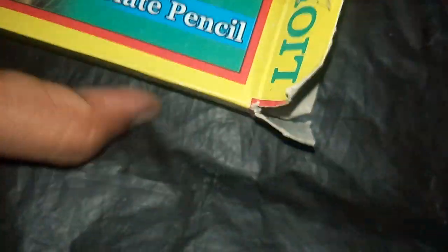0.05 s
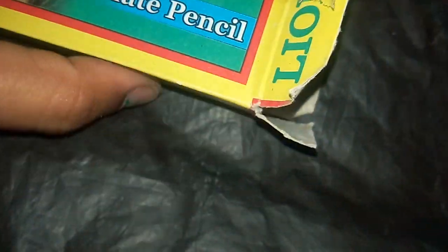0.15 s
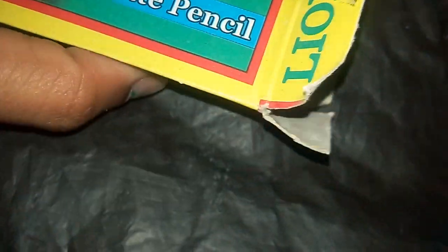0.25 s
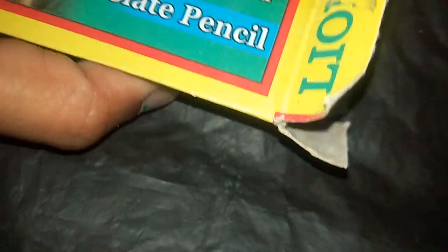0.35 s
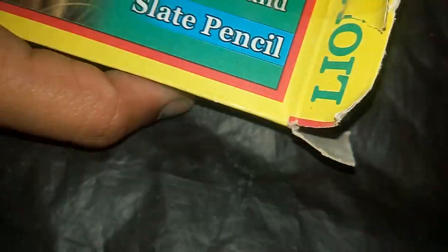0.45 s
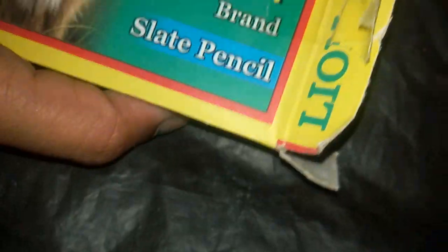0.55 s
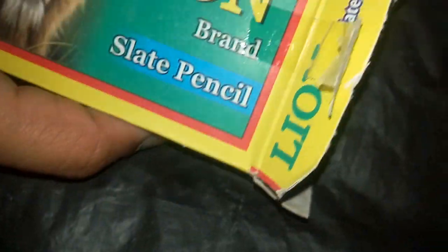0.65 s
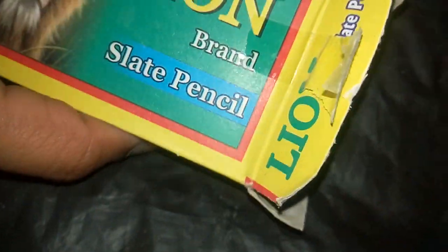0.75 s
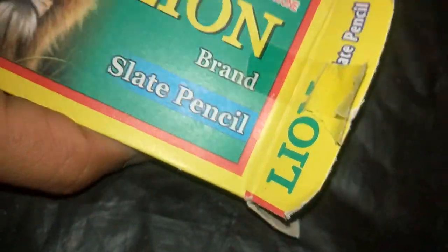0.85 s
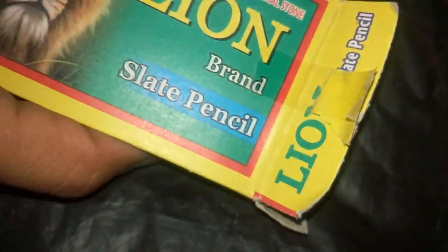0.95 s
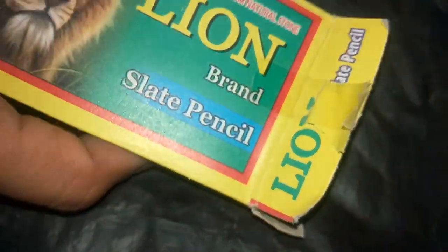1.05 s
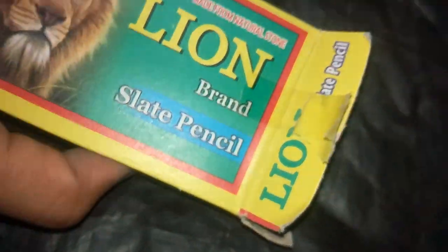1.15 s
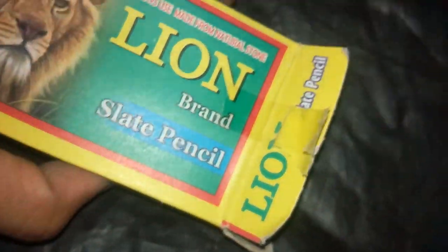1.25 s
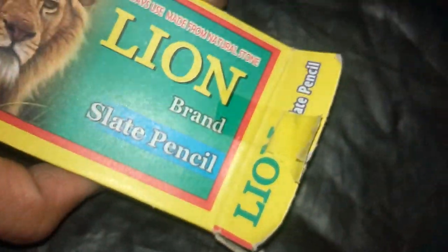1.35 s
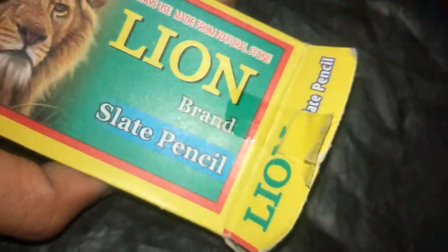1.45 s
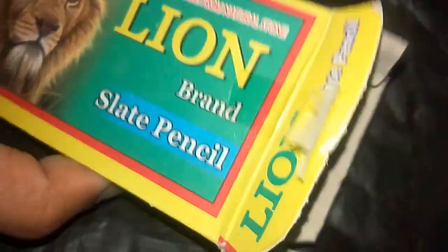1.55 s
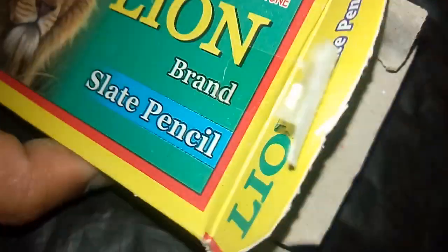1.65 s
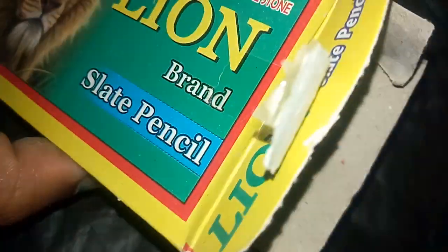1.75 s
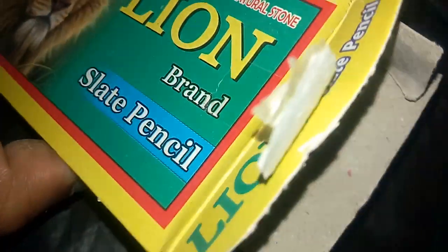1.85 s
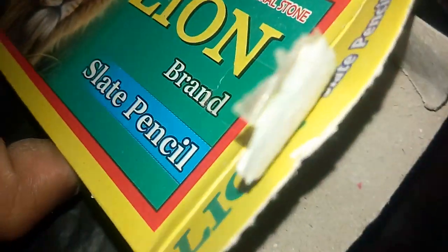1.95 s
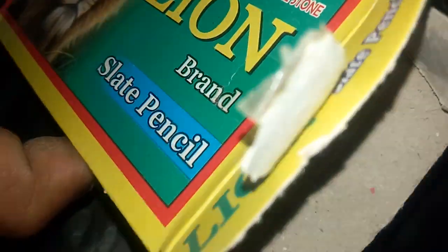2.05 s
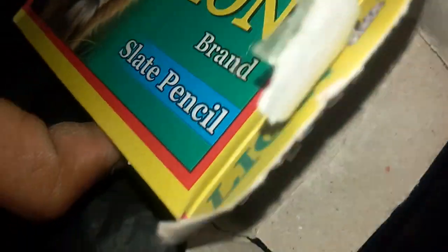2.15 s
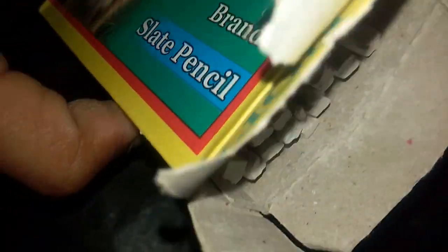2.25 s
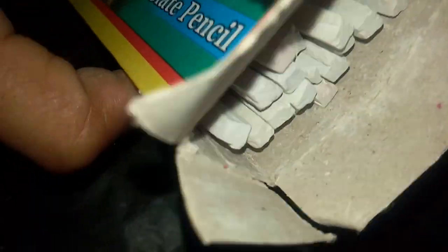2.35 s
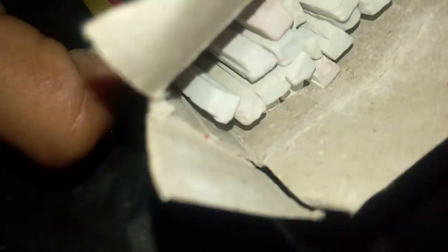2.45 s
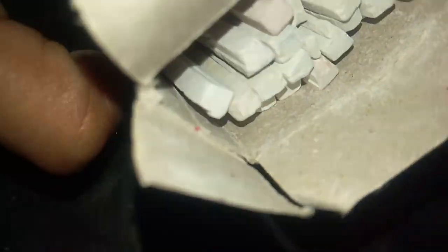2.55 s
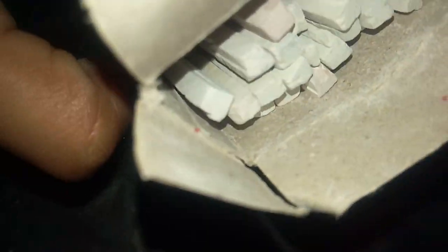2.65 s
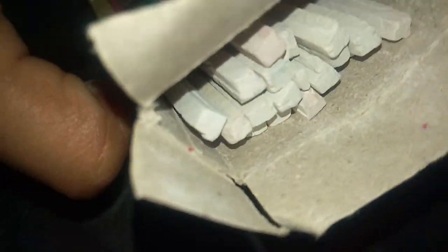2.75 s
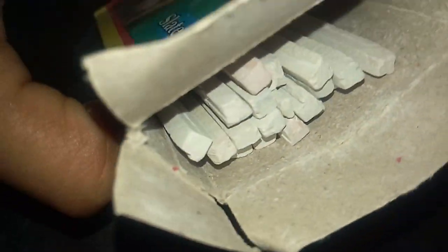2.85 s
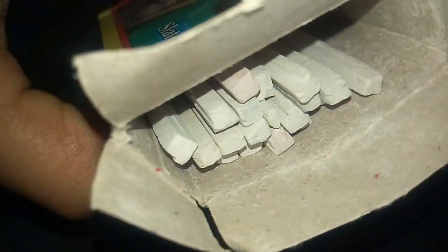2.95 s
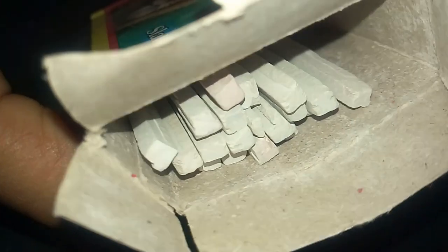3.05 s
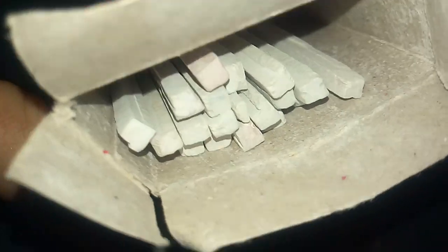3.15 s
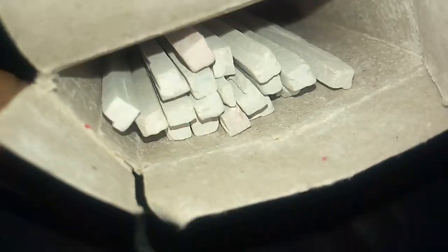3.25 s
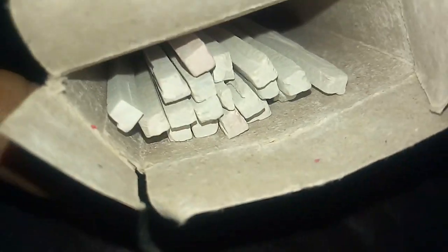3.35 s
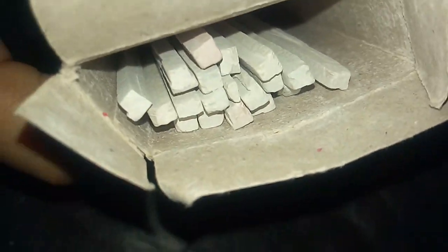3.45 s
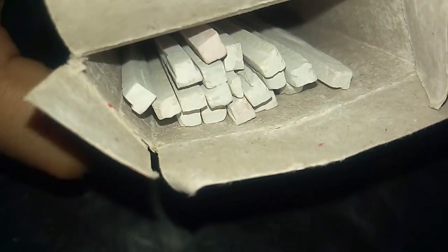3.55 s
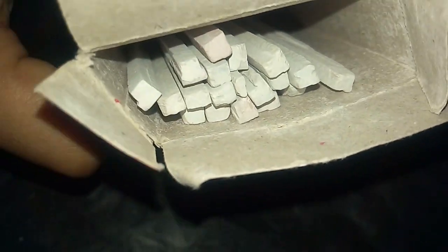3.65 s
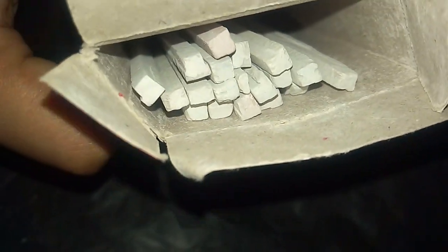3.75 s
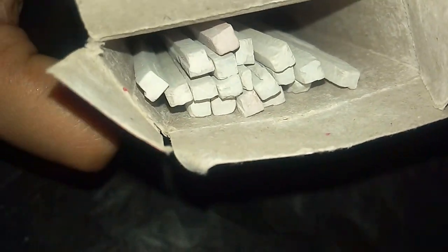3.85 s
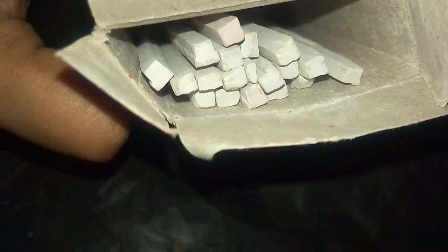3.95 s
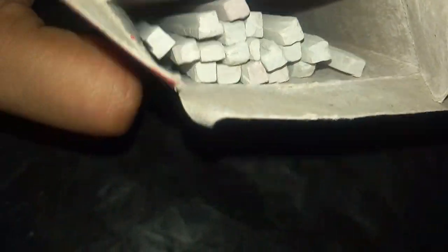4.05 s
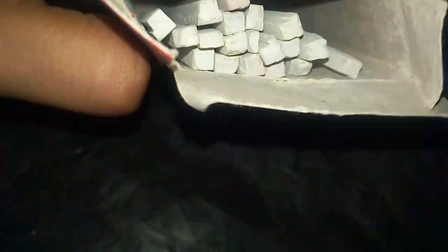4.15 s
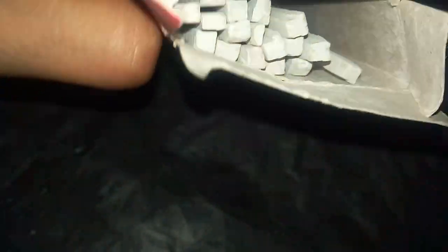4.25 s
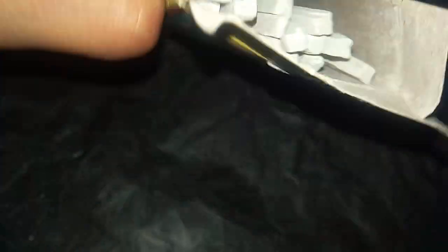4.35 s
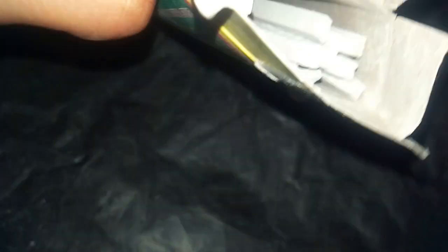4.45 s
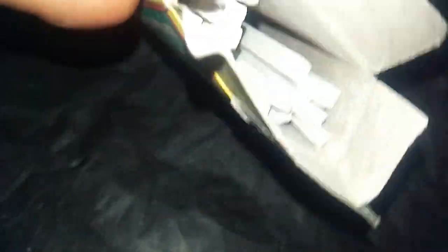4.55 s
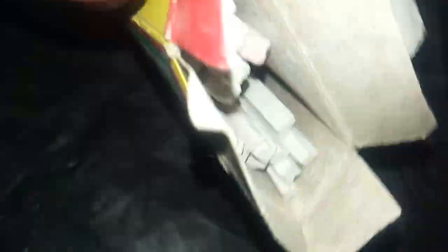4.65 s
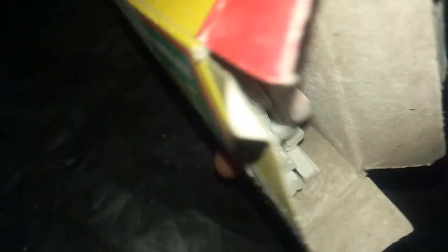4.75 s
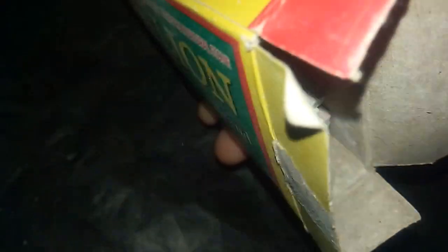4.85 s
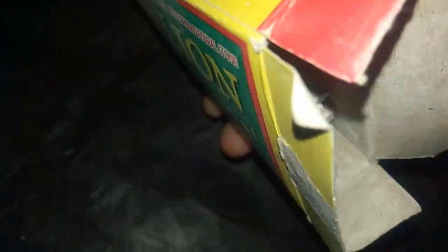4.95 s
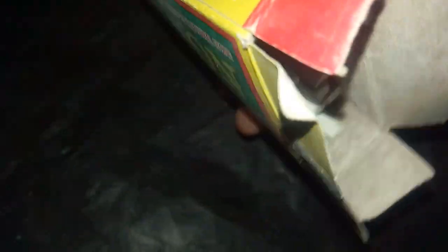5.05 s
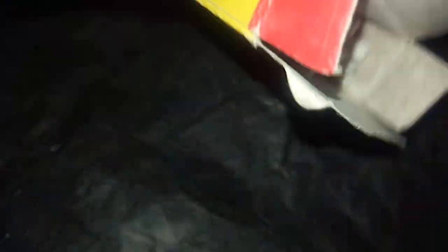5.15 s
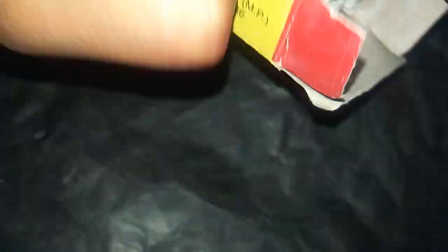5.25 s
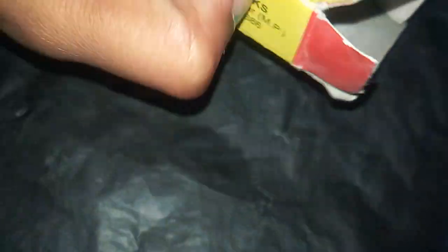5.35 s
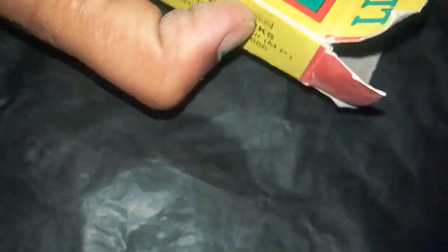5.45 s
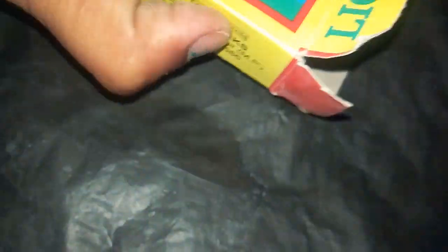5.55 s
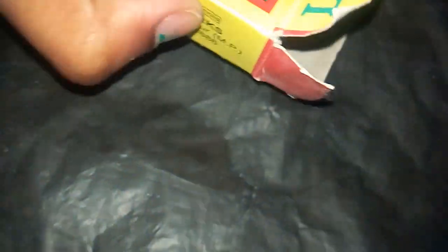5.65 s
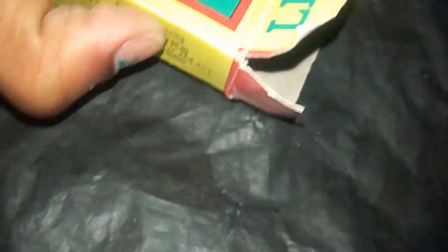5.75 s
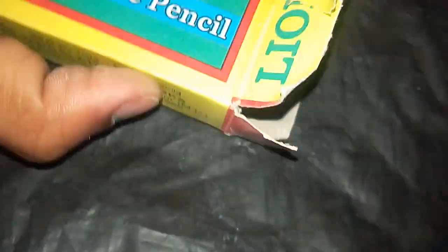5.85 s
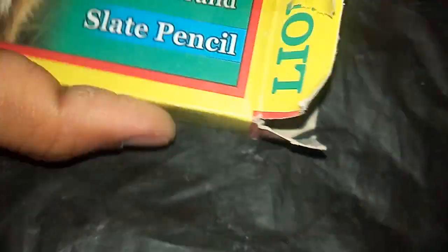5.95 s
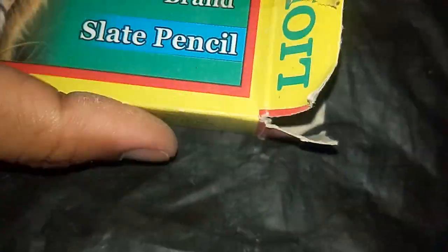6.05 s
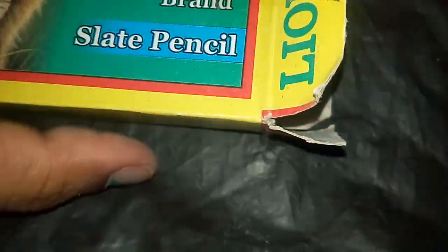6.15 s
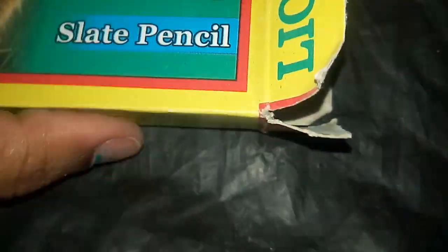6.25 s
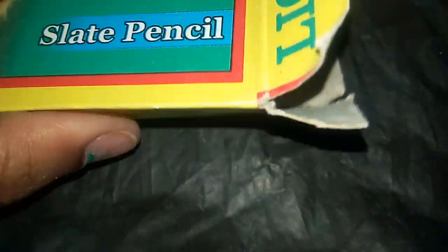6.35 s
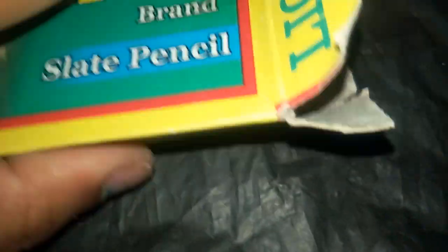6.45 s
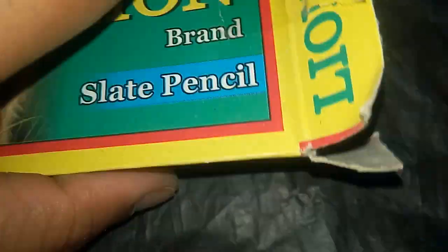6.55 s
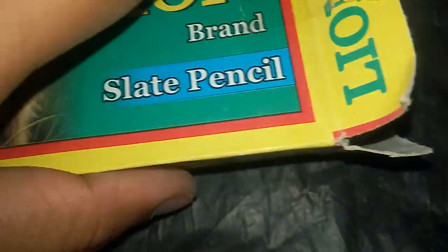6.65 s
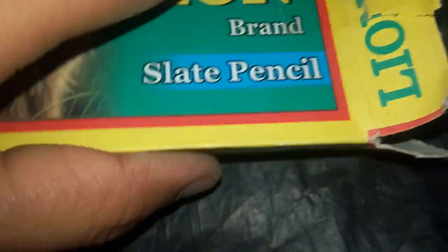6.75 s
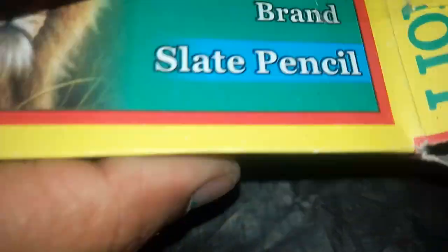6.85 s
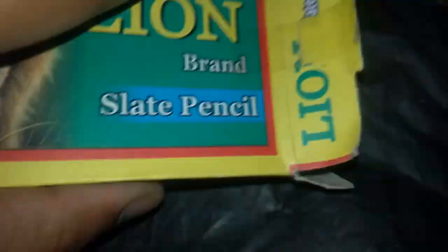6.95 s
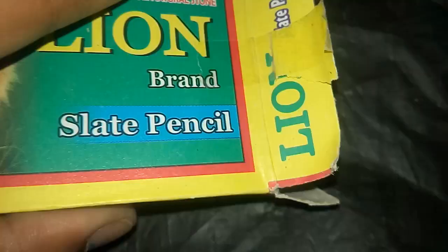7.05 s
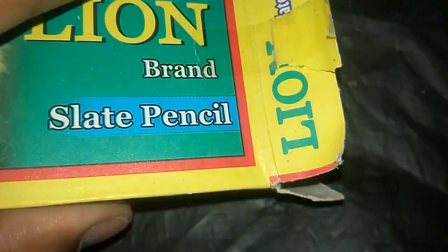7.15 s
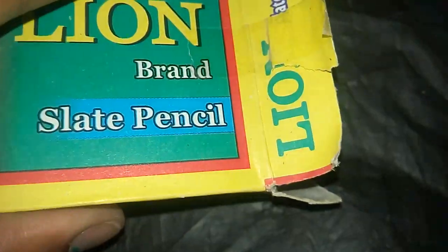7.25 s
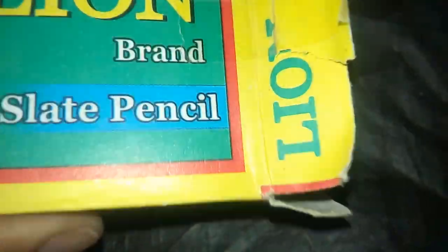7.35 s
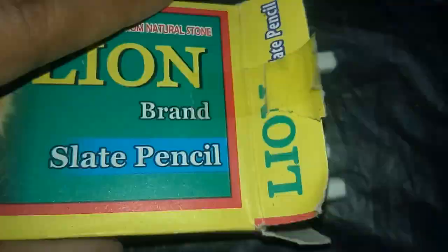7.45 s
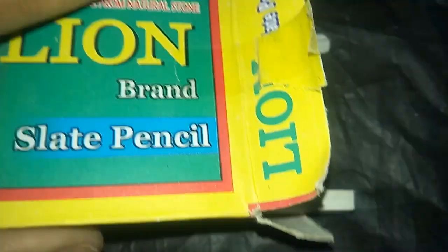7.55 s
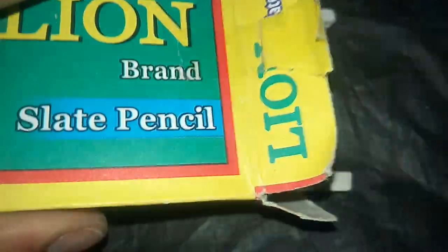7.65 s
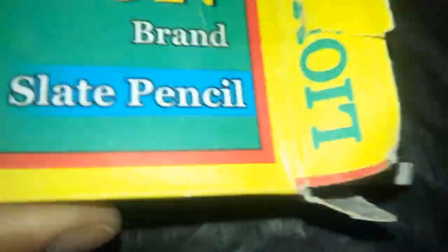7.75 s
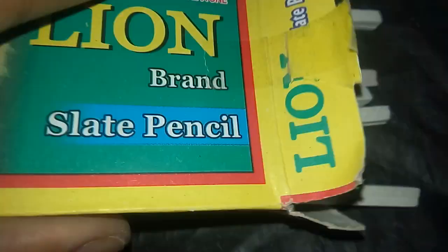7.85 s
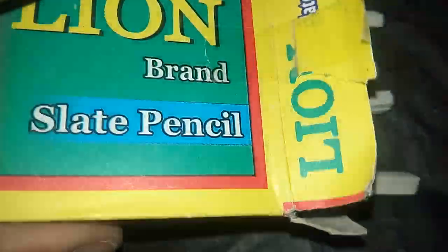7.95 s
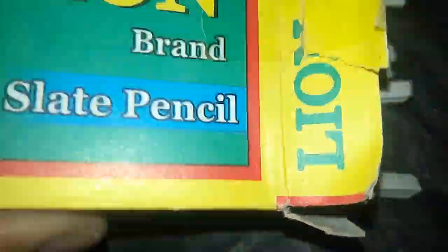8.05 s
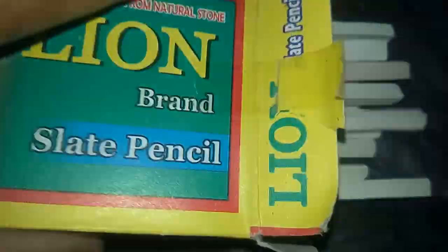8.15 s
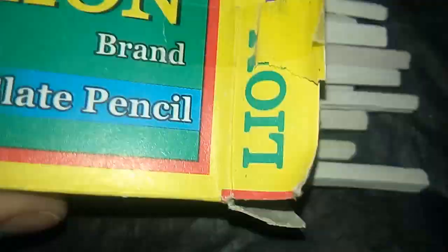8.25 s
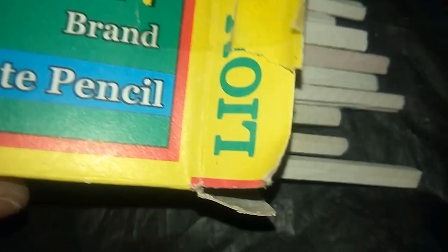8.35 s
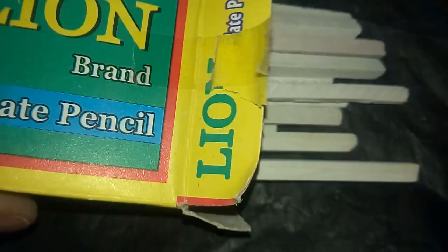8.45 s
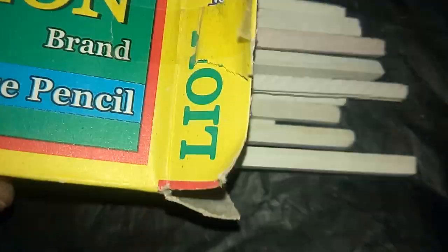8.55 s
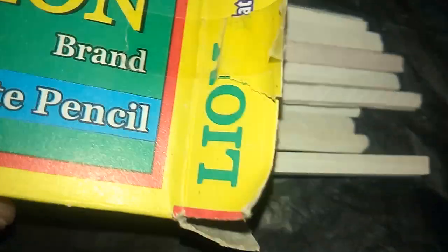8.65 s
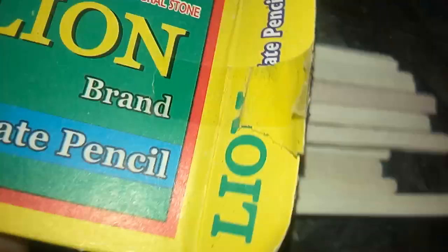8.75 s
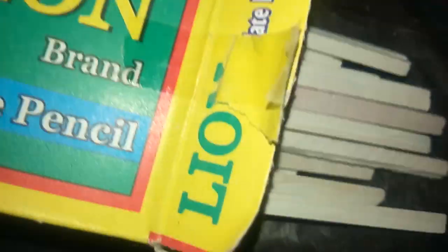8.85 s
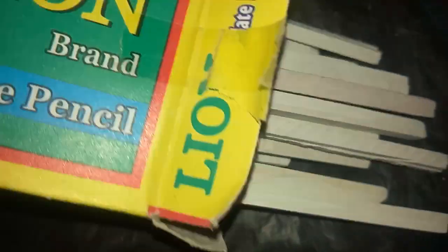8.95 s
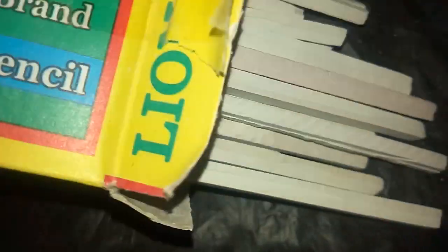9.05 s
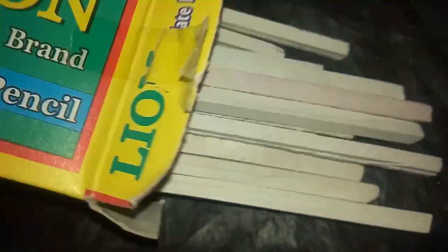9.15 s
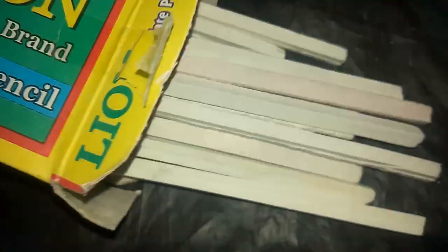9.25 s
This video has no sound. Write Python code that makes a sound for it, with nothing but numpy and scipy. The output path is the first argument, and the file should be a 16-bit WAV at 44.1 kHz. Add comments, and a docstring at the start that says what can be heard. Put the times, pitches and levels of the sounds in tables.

```python
"""Slate pencils in a cardboard box

A thin box is turned in the hand close to two microphones, its flap opened and shut. Fingers rub the
card and the creases snap. Then the box is shaken, and the stone sticks slide, collide and work their
way out. The room is quiet, apart from a thin whirr and two dull booms that roll in from far off."""
import sys
import numpy as np
from scipy import signal
from scipy.fft import rfft, irfft
from scipy.io import wavfile

SR = 44100
rng = np.random.default_rng(int(sys.argv[2]) if len(sys.argv) > 2 else 0)


def wrap_up_sound(samples):
    """Save the sound to the file named by the first command line argument, as 16-bit audio."""
    columns = np.atleast_2d(samples).T
    # keep every value between -1 and 1, then stretch to whole-number steps
    tamed = np.clip(columns, -1, 1)
    steps = np.round(tamed * 32767).astype(np.int16)
    wavfile.write(sys.argv[1], SR, steps)


N = 409248
TIME = np.arange(N) / SR


def from_db(db):
    """Turn decibels into a gain to multiply by."""
    return 10 ** (np.asarray(db) / 20)


def unit_power(x):
    """Scale a sound to an average power of 1."""
    return x / np.sqrt(np.mean(x ** 2) + 1e-20)


def drift(per_s):
    """A random wander around zero, mostly between -1 and 1."""
    steps = rng.standard_normal(4096)
    return np.interp(TIME * per_s, np.arange(len(steps)), steps)


def keep_band(x, hz, kind, order=2):
    """Let only the lows, the highs or a band between them through."""
    return signal.sosfilt(signal.butter(order, hz, kind, fs=SR, output="sos"), x + 1e-18)


def colour(x, curve, keep_power=True, size=4096):
    """Make some pitches stronger and others weaker, following rows of frequency in Hz and dB."""
    known_hz, db = np.transpose(curve)
    hz = np.fft.rfftfreq(size, 1 / SR)
    gain = from_db(np.interp(np.log(hz + 1), np.log(known_hz), db))
    cepstrum = irfft(np.log(unit_power(gain) if keep_power else gain))
    # folding it in half keeps the filter from ringing before a sound arrives
    cepstrum[1:size // 2] *= 2
    cepstrum[size // 2 + 1:] = 0
    return signal.oaconvolve(x, irfft(np.exp(rfft(cepstrum))))[:N]


def resonate(x, hz, width_hz):
    """Ring at one pitch; the greater the width, the sooner it dies."""
    r = np.exp(-np.pi * width_hz / SR)
    feedback = [1, -2 * r * np.cos(2 * np.pi * hz / SR), r * r]
    return (1 - r * r) / 2 * signal.lfilter([1, 0, -1], feedback, x + 1e-18)


def lean(pair, balance):
    """Share a sound between left and right, pitch by pitch."""
    return np.array([colour(ear, [(hz, side * db / 2) for hz, db in balance], keep_power=False)
                     for ear, side in zip(pair, (1, -1))])


def echoes(x, fade_s, gap_s, size=16384):
    """Dense reflections, different at each microphone, that fall 60 dB in fade_s."""
    t = np.arange(size) / SR
    tails = rng.standard_normal((2, size)) * from_db(-60 * t / fade_s) * (t > gap_s)
    return np.array([signal.oaconvolve(x, unit_power(tail) / np.sqrt(size))[:N] for tail in tails])


def grains(per_s, spread_db):
    """Tiny contacts of uneven size at random moments."""
    sizes = from_db(spread_db * np.minimum(rng.exponential(1, N), 4)) * rng.choice([-1, 1], N)
    return unit_power(sizes * (rng.random(N) < per_s / SR))


def jolts(rows):
    """A strength that swells and dies around each listed moment."""
    return np.sqrt(sum((from_db(db) / np.cosh(np.clip((TIME - s) / half_s, -50, 50))) ** 2
                       for s, db, half_s in rows))


def hold(start_s, length_s, attack_s=0.028, release_s=0.025):
    """A gain that fades in, stays at 1 and lets go."""
    early = np.maximum(start_s - TIME, 0)
    late = np.maximum(TIME - start_s - length_s, 0)
    return np.exp(-np.minimum(early / attack_s + late / release_s, 30))


def swell(peak_s, rise_s, fall_s):
    """A gain that grows to 1 and dies away at once."""
    return np.exp(-np.minimum(np.maximum((peak_s - TIME) / rise_s, (TIME - peak_s) / fall_s), 30))


# The tone of the quiet room. Each row: frequency in Hz, relative level in dB.
AIR_TONE = [(25, -26), (59, 0), (133, -6.5), (216, -10.5), (391, -10.5), (500, -1.5), (700, -14.5),
            (1000, -16.5), (1460, -18), (2400, -10.5), (3370, -14.5), (6500, -23), (8000, -42),
            (15000, -37)]
# How alike its two sides are. Each row: frequency in Hz, likeness (1 the same, 0 unrelated).
AIR_LIKENESS = [(60, 0.9), (180, 0.47), (550, 0.59), (1650, -0.28), (4970, 0.044), (15000, -0.02)]
# It is brighter on the right. Each row: frequency in Hz, left over right in dB.
AIR_BALANCE = [(550, 1), (1650, -7.5), (5000, -13.5), (15000, 1)]


def room_air():
    """The room's steady hush, less alike left and right toward the treble."""
    shared, apart = [colour(noise, AIR_TONE) for noise in rng.standard_normal((2, N))]
    apart_curve = [(hz, 10 * np.log10((1 - alike) / (1 + alike))) for hz, alike in AIR_LIKENESS]
    apart = colour(apart, apart_curve, keep_power=False)
    return from_db(-67.5) * lean([shared + apart, shared - apart], AIR_BALANCE)


# How the background whirr fades. Each row: time in seconds, level in dB.
WHIRR_LEVELS = [(0, -55), (1.2, -57), (2.3, -58.5), (2.8, -76), (4.1, -74), (9.28, -94.5)]
# Its tone. Each row: frequency in Hz, relative level in dB.
WHIRR_TONE = [(1100, -22.5), (1480, -0.5), (2000, -5.5), (2400, -1), (2900, 0), (3600, -1.5), (4400, -6),
              (6500, -9), (9000, -31.5)]
# Its squeak stands out. Each row: peak time in seconds, relative level in dB, half-length in seconds.
SQUEAKS = [(1.48, -67.5, .08), (2.14, -67, 0.067)]


def whirr():
    """A thin hiss near 3 kHz with a fitful squeak in it; both sink away after two seconds or so."""
    level = from_db(np.interp(TIME, *np.transpose(WHIRR_LEVELS)))
    hiss = np.array([colour(noise, WHIRR_TONE) for noise in rng.standard_normal((2, N))])
    squeak = 0
    for hz in (2860, 3280):
        note = resonate(resonate(rng.standard_normal(N), hz, width_hz=120), hz, width_hz=120)
        squeak += unit_power(note) * from_db(2.6 * drift(7.1))
    return level * (hiss + from_db(-17) * squeak) + jolts(SQUEAKS) * squeak


# The box lies toward the left microphone. Each row: frequency in Hz, left over right in dB.
BOX_BALANCE = [(60, 3), (200, 10), (600, 4), (1300, 9), (2400, 4.5), (4400, -3.5), (8000, -2), (15000, 7.5)]


def from_box(x, turns_per_s, paths, lag_s=0.00017):
    """Sound reaches the left microphone first; its paths off hand and flaps change as the box moves."""
    direct = np.array([x, np.interp(TIME - lag_s, TIME, x)])
    upper = keep_band(x, 614, "high")
    shares = np.array([from_db(10 * drift(turns_per_s)) for _ in range(paths)])
    shares /= np.sqrt(np.sum(shares ** 2, axis=0))
    scattered = sum(share * echoes(upper, fade_s=0.016, gap_s=0.0003, size=2048) for share in shares)
    return lean(direct + from_db(-0.5) * scattered, BOX_BALANCE)


# Fingers rub the card or bend a flap. Each row: start and length in seconds, then the
# relative levels in dB of surface hiss, edge scrape and wall drumming.
RUBS = [(-0.02, .2, -52, -61.5, -60), (0.306, 0.057, -54, -72, -61.5), (0.416, .16, -57, -81, -55.5),
        (0.68, 0.21, -51, -68.5, -57.5), (1.024, 0.43, -61.5, -87, -72), (1.52, 0.16, -54.5, -75, -60.5),
        (1.736, 0.32, -54.5, -75, -63.5), (2.204, 0.14, -53, -68.5, -64), (2.36, 0.12, -58.5, -77, -73),
        (2.493, 0.13, -65, -84, -64), (2.64, 0.14, -68.5, -88, -71.5), (2.917, 0.68, -73.5, -89, -78),
        (4.1, 0.045, -54.5, -77, -65.5), (4.188, 0.098, -57.5, -84, -82), (4.51, 0.38, -48, -68, -58),
        (4.981, 0.035, -54.5, -95, -73), (5.094, 0.064, -56.5, -78, -88), (5.241, 0.1, -48.5, -69, -62),
        (5.385, .24, -48.5, -66.5, -60), (5.724, .05, -68, -90, -63.5), (5.885, 0.061, -52, -71, -63.5),
        (6.11, .14, -60, -79, -60), (6.265, 0.045, -51, -65.5, -55), (6.366, 0.13, -53.5, -74, -56.5),
        (6.455, .11, -48.5, -64.5, -51.5), (6.63, 0.31, -56, -76.5, -58.5), (7.407, .035, -55, -80, -56),
        (7.627, .15, -52.5, -73, -50), (8.03, .12, -58.5, -78, -51), (8.316, 0.16, -50.5, -68, -51.5),
        (8.598, 0.21, -52, -67.5, -55)]
# Sticks slide along the box and come to rest. Each row: peak time, rise and fall in seconds,
# then the relative levels in dB of surface hiss and wall drumming.
SLIDES = [(1.66, 0.031, 0.021, -42.5, -45.5), (4.465, 0.044, 0.057, -34, -49.5),
          (4.866, 0.038, 0.018, -27.5, -43.5), (6.04, 0.03, 0.028, -37, -48), (6.98, 0.034, .03, -31, -39),
          (7.05, .02, 0.03, -33, -37), (7.534, 0.015, 0.039, -27, -27), (7.93, .026, 0.039, -32, -31),
          (8.228, .026, 0.05, -28.5, -27.5), (8.45, 0.021, .015, -42, -45.5),
          (8.544, 0.03, 0.038, -34, -33.5), (8.885, 0.045, 0.075, -37.5, -42),
          (9.112, 0.11, 0.029, -36.5, -41), (9.234, 0.015, 0.038, -32, -37)]


def friction(slide_edge_db=-16, resting_db=-81):
    """Rubs and slides add up to the strength of the hiss, the edge scrape and the drumming."""
    strokes = [(hold(s, length_s), levels) for s, length_s, *levels in RUBS]
    strokes += [(swell(*timing), (hiss_db, hiss_db + slide_edge_db, wall_db))
                for *timing, hiss_db, wall_db in SLIDES]
    envelopes, levels_db = zip(*strokes)
    hiss, edge, wall = np.sqrt(from_db(levels_db).T ** 2 @ np.square(envelopes))
    resting = from_db(resting_db)  # the hand is never quite still
    return np.hypot(hiss, resting), edge, np.hypot(wall, resting)


# Patches of card, each with its own note. Each row: pitch in Hz, width in Hz.
CARD_PATCHES = [(1950, 200), (2550, 350), (3200, 770), (4000, 650), (4800, 1200), (5500, 410), (6300, 1740)]


def card_patches(grit):
    """The point of contact moves, so now one patch of card sings out, now another."""
    return sum((-1) ** k * from_db(2.7 * drift(12)) * resonate(grit, hz, width_hz)
               for k, (hz, width_hz) in enumerate(CARD_PATCHES))


# What drums on the wall. Each row: time in seconds, the sticks' share from 0 to 1 (the rest is fingers).
STICK_SHARE = [(0, 0.5), (.9, 0.44), (4.2, 0.8), (4.4, 0.44), (4.9, 1), (5.1, 0.16), (5.7, 0), (6.0, 0.14),
               (6.8, 0.28), (7.4, 1), (9.28, 0.97)]
# The tones of the card's surface, of scraping edges, and of the wall under sticks and under fingers.
# Each row: frequency in Hz, relative level in dB.
SURFACE_TONE = [(900, -18), (1550, 2), (2500, 4), (3800, 6), (5200, 2), (6500, 8.5), (7200, 2.5),
                (8100, -21), (10500, -33.5), (15500, -37.5)]
EDGE_TONE = [(3000, -5.5), (6500, -1.5), (8000, 1), (10500, -6.5), (12000, -11), (15000, -22)]
STICK_WALL_TONE = [(40, -24), (90, -7), (200, -1.5), (330, 5.5), (500, 1), (680, 2.5), (820, -1),
                   (1250, -12), (1680, 5.5), (2100, -16.5), (2550, 2.5), (4000, -22), (9000, -54)]
FINGER_WALL_TONE = [(40, -9.5), (200, -24.5), (400, -7), (650, 1.5), (820, 3.5), (970, 6), (1200, -7),
                    (1700, -3.5), (3000, 2), (9000, -48)]


def rubbing():
    """Fine grains hiss on the card's surface; coarser catches of fingers and sticks drum on its wall."""
    hiss, edge, wall = friction()
    share = np.clip(np.interp(TIME, *np.transpose(STICK_SHARE)), 0, 1)
    grip = from_db(2.6 * drift(70))  # catching and slipping
    fine = grains(per_s=12000, spread_db=3.5) * hiss * grip
    gritty = grains(per_s=6200, spread_db=4.0) * hiss * grip
    sharp = rng.standard_normal(N) * edge * grip  # contacts too dense to tell apart
    coarse = grains(per_s=900, spread_db=3.0) * wall * from_db(3.1 * drift(50))
    surface = from_db(-4.5) * colour(fine, SURFACE_TONE)
    patches = from_db(-1.5) * keep_band(card_patches(gritty), [1200, 7000], "band", order=5)
    scrape = from_db(1.5) * colour(sharp, EDGE_TONE)
    sticks = from_db(-0.5) * colour(coarse * np.sqrt(share), STICK_WALL_TONE)
    fingers = from_db(-2) * colour(coarse * np.sqrt(1 - share), FINGER_WALL_TONE)
    return from_box(surface + patches + scrape + sticks + fingers, turns_per_s=9, paths=6)


# The sticks or the hand bump the box.
# Each row: peak time in seconds, relative level in dB, half-length in seconds.
BUMPS = [(.06, -61.5, 0.079), (.48, -63, 0.042), (2.53, -66, .05), (3.56, -65, 0.006), (4.62, -61.5, 0.1),
         (4.87, -40.5, 0.017), (5.27, -65.5, 0.039), (6.07, -63, 0.028), (6.3, -64, 0.12),
         (7.0, -53, 0.022), (7.62, -55, 0.054), (7.97, -51.5, 0.032), (8.25, -44.5, 0.028),
         (8.56, -45.5, 0.025), (8.72, -64, 0.048), (8.92, -53.5, 0.011)]


def bumps():
    """Soft blows reach only the lowest notes of the box."""
    rumble = keep_band(rng.standard_normal(N), [90, 230], "band", order=3)
    thud = unit_power(rumble) * jolts(BUMPS)
    return lean([thud, thud], BOX_BALANCE)


# A tick's levels in dB: its thud against the rub's drumming, its knock and crack against the rub's hiss.
TICK_OFFSETS_DB = [-2, -4.5, -1]


def card_ticks(per_s=5, count=60, thud_hz=750, knock_hz=2080, spread_db=2, left_db=6.5):
    """Rubbed card ticks at random, louder in a stronger rub; gives more rows for snaps() to play."""
    rows = []
    moments = np.cumsum(rng.exponential(1 / per_s, count))
    for s, chance in zip(moments, rng.standard_normal((count, 5))):
        for start_s, length_s, hiss_db, _, wall_db in RUBS:
            if start_s < s < min(start_s + length_s, TIME[-1]):
                pitches = np.array([thud_hz, knock_hz]) * 2 ** (0.23 * chance[:2])
                rub_db = np.array([wall_db, hiss_db, hiss_db])
                levels_db = rub_db + TICK_OFFSETS_DB + spread_db * chance[2:]
                rows.append((s, *pitches, *levels_db, left_db))
    return rows


# Creases snap and single sticks knock; the two lower notes depend on where the box is struck.
# Each row: start in seconds, thud and knock pitch in Hz, relative levels of thud, knock and crack
# in dB, left over right in dB.
SNAPS = [(0.179, 790, 2380, -55, -50, -58, 13), (0.471, 970, 1900, -47.5, -59, -67, 19),
         (0.477, 460, 2100, -59, -38.5, -51, 8), (0.505, 970, 1520, -47.5, -48.5, -52.5, 10),
         (0.87, 724, 2020, -50, -39, -43, 5.5), (1.659, 370, 1710, -46, -55, -47, 7),
         (1.859, 400, 1740, -47, -44.5, -44, 5), (1.945, 447, 2400, -45, -48, -61, 7),
         (2.01, 230, 2100, -53, -50, -56, 4), (2.325, 261, 2080, -54, -43.5, -55, 7),
         (2.592, 300, 3100, -68, -59, -51, -9), (2.77, 980, 1540, -82, -51.5, -44.5, 12.5),
         (2.891, 576, 2000, -63.5, -62, -66, -15), (3.402, 553, 2880, -65, -60, -67, -11),
         (4.081, 350, 2980, -72, -54, -51.5, 2), (4.11, 500, 1590, -67, -50, -51, 12),
         (4.541, 524, 1900, -39, -28.5, -35.5, 11), (4.728, 410, 2880, -50, -41, -45, 13.5),
         (4.772, 690, 2900, -56, -42, -30, 6), (5.258, 980, 2470, -49.5, -37.5, -33, 7.5),
         (5.314, 350, 2400, -75, -64, -46, 0), (5.369, 590, 3110, -72, -46, -43, -2),
         (5.443, 835, 2700, -48.5, -65, -50, 12.5), (5.766, 670, 2400, -66, -55, -70, 11),
         (5.859, 870, 2400, -62, -62, -66, 15), (6.253, 570, 2110, -45, -46, -49, 7),
         (6.264, 1110, 2000, -46, -39.5, -46, 9.5), (6.301, 690, 2430, -37, -34.5, -49.5, 11),
         (6.363, 640, 1500, -48, -54, -61, -10), (6.501, 980, 1700, -51.5, -54, -45.5, 6),
         (6.57, 798, 1810, -44, -45.5, -57, 8.5), (6.661, 920, 2380, -56.5, -47, -64, 14),
         (6.816, 684, 2620, -53.5, -49, -58, 12), (6.932, 302, 2000, -46, -40.5, -55, 8.5),
         (6.976, 460, 2010, -47, -27.5, -39.5, 18.5), (7.056, 524, 1710, -47, -26.5, -29.5, 4),
         (7.269, 430, 2270, -64, -62, -71, -14), (7.4945, 410, 3000, -34, -29, -36, 13),
         (7.694, 436, 1790, -25.5, -27.5, -36, 8.5), (7.72, 450, 2290, -33, -31.5, -49, 6),
         (7.7917, 550, 1863, -44, -28.5, -32, 3), (7.799, 504, 1600, -45, -42.5, -57, 20),
         (8.092, 510, 1890, -55, -39.5, -61, 9.5), (8.103, 638, 1690, -43.5, -43, -54, 13),
         (8.364, 332, 1800, -53, -44, -45, 6), (8.51, 710, 2210, -54, -35.5, -43, 7),
         (8.635, 340, 1740, -59, -36.5, -44.5, 6), (8.75, 910, 2500, -65, -50, -44, 1),
         (8.877, 450, 1740, -65, -42, -35.5, -3), (9.201, 290, 2700, -42, -43, -46, 13),
         (9.25, 493, 1700, -54, -39, -35, 5)]


def snaps(crack_hz=5110, size=2048):
    """A sharp release and a brief crunch set off three short notes; the low one lasts longest."""
    out = np.zeros((2, N + size))
    t = np.arange(size) / SR
    # Thud, knock and crack. Each row: width as a share of pitch, crunch time in seconds, gain in dB.
    notes = [(0.68, 0.0036, -1), (0.47, 0.0036, -4), (0.54, 0.0016, -0.5)]
    for s, thud_hz, knock_hz, *levels_db, left_db in SNAPS + card_ticks():
        snap = 0
        for (width, crunch_s, gain_db), hz, db in zip(notes, (thud_hz, knock_hz, crack_hz), levels_db):
            # the higher the note, the less alike its crunch is at the two microphones
            crunch = rng.standard_normal(size) + hz / 5000 * rng.standard_normal((2, size))
            contacts = 0.41 * crunch * (np.exp(-t / crunch_s) + from_db(-36) * np.exp(-t / 0.01))
            contacts[:, 0] = 1  # the release itself
            burst = resonate(resonate(contacts, hz, width * hz), hz, width * hz)
            snap += from_db(db + gain_db) * burst * np.sqrt(0.024 * SR / np.sum(burst ** 2))
        for ear, (side, lag_s) in enumerate([(1, 0.00068), (-1.06, 0.0000067)]):
            start = round((s + lag_s) * SR)
            out[ear, start:start + size] += snap[ear] * from_db(side * left_db / 2)
    return out[:, :N]


# Two far booms. Each row: start and rise time in seconds, relative levels of boom and tail in dB.
BOOMS = [(1.36, 0.09, -35, -59), (1.718, .04, -38.5, -47)]


def boom_strength(fall_db_per_s, tail_db_per_s, hold_s=0.021, roll_s=0.875):
    """Each boom swells, holds and falls, leaving a wavering tail of echoes."""
    power = 0
    waver = from_db(2.3 * drift(23))
    for s, rise_s, boom_db, tail_db in BOOMS:
        onset = np.clip((TIME - s) / rise_s, 0, 1)
        age = np.maximum(TIME - s - rise_s - hold_s, 0)
        boom = from_db(boom_db - fall_db_per_s * age)
        tail = from_db(tail_db - tail_db_per_s * age) * waver * hold(s, roll_s)
        power += onset ** 2 * (boom ** 2 + tail ** 2)
    return np.sqrt(power)


# The dull tone of the booms. Each row: frequency in Hz, relative level in dB.
BOOM_TONE = [(21, -64), (35, -23), (80, -10), (120, -9), (152, 7), (190, -3), (260, -0.5), (420, -2.5),
             (560, -9), (700, -19.5), (850, -24), (1200, -25), (2000, -80)]


def far_booms():
    """Far booms roll on, the low part longest, alike at both microphones."""
    low = boom_strength(fall_db_per_s=75, tail_db_per_s=20)
    upper = from_db(1.9) * boom_strength(fall_db_per_s=160, tail_db_per_s=47)
    roll = colour(rng.standard_normal(N), BOOM_TONE)
    low *= unit_power(keep_band(roll, 220, "low", order=3))
    upper *= unit_power(keep_band(roll, 280, "high", order=3))
    return from_db(-2) * keep_band(low + upper, 1160, "low", order=4)


# The notes of the box with the sticks inside. Each row: pitch in Hz, width in Hz, relative level in dB.
BOX_NOTES = [(352, 540, -12), (455, 240, 3), (694, 37, 11), (794, 86, 16), (985, 27, -4), (1543, 130, -6),
             (1940, 33, -28), (2470, 34, 16), (2540, 130, -12), (3080, 530, -11), (3800, 200, -4),
             (5000, 100, 1), (4910, 160, 18), (5070, 78, -39), (5930, 230, 11), (6700, 220, 0),
             (6850, 130, -7), (7110, 180, 18)]


def box_ring(contacts):
    """Every contact strikes each note of the box with a strength of its own."""
    out, power = np.zeros(N), 0
    hits = np.flatnonzero(contacts)
    strengths = rng.standard_normal(N)
    for k, (hz, width_hz, db) in enumerate(BOX_NOTES):
        push = np.zeros(N)
        push[hits] = contacts[hits] * strengths[hits - k]
        out += from_db(db) * resonate(push, hz, width_hz)
        power += from_db(db) ** 2 * np.pi * width_hz / SR
    return out / np.sqrt(power)  # about as strong as what went in


# The bundle of sticks shifts and collides. Each row: peak time and half-length in seconds,
# then the relative levels in dB of stone on wall and stone on stone.
CLATTERS = [(4.486, 0.011, -43, -39.5), (4.863, 0.0091, -35.5, -32), (6.996, 0.01, -29, -31.5),
            (7.041, 0.011, -23.5, -31), (7.513, 0.0023, -28, -24.5), (7.544, 0.0037, -14, -9.5),
            (7.552, 0.0035, -18, -13.5), (7.579, 0.008, -29, -29), (7.92, 0.014, -22.5, -26),
            (7.931, 0.0039, -14.5, -11.5), (8.205, 0.0034, -31, -22), (8.216, 0.0046, -23.5, -22),
            (8.229, 0.0038, -11, -14), (8.24, 0.0077, -28, -30), (8.533, 0.0076, -35.5, -38.5),
            (8.545, 0.0026, -23, -20.5), (8.902, 0.012, -51, -60), (9.238, 0.013, -41, -51)]
# The tones of stone on wall and of stone on stone. Each row: frequency in Hz, relative level in dB.
THUMP_TONE = [(50, -18), (120, -15), (230, -4), (350, 2), (520, -0.5), (800, -0.5), (1050, -5),
              (1290, -12.5), (1700, 1), (2130, -6), (2550, 0.5), (3200, -5.5), (4500, -4), (9000, -47)]
CLINK_TONE = [(1200, -34), (2500, -13), (3700, 0), (4800, -3.5), (6000, 5), (7200, -3), (8200, -5),
              (11300, -13.5), (12500, -17.5), (15700, -31)]


def stick_clatter(extra_left_db=1.5):
    """Each jolt packs many collisions, with the wall and between the stones, into an instant."""
    wall_jolts = jolts([(s, db, half_s) for s, half_s, db, _ in CLATTERS])
    stone_jolts = jolts([(s, db, half_s) for s, half_s, _, db in CLATTERS])
    on_wall = grains(per_s=3500, spread_db=4.0) * wall_jolts
    on_stone = grains(per_s=2700, spread_db=1.5) * stone_jolts
    thumps = from_db(-0.94) * colour(on_wall, THUMP_TONE)
    clinks = from_db(-2.5) * colour(on_stone, CLINK_TONE)
    ringing = from_db(-9) * box_ring(on_wall + on_stone)
    pair = from_box(thumps + clinks + ringing, turns_per_s=25, paths=4)
    return pair * from_db([[extra_left_db / 2], [-extra_left_db / 2]])


def scene():
    """The box close by, with a faint room around it."""
    box = rubbing() + snaps() + stick_clatter() + bumps()
    room_echo = echoes(keep_band(box[0], 5400, "low"), fade_s=0.12, gap_s=0.011)
    return box + from_db(-18.5) * room_echo + far_booms() + whirr() + room_air()


def record(dry):
    """Flatten any peak beyond full scale and cut the highest treble."""
    return keep_band(np.clip(dry, -1, 1), 15700, "low", order=20)


dry = scene()
out = record(dry)
wrap_up_sound(out)
```